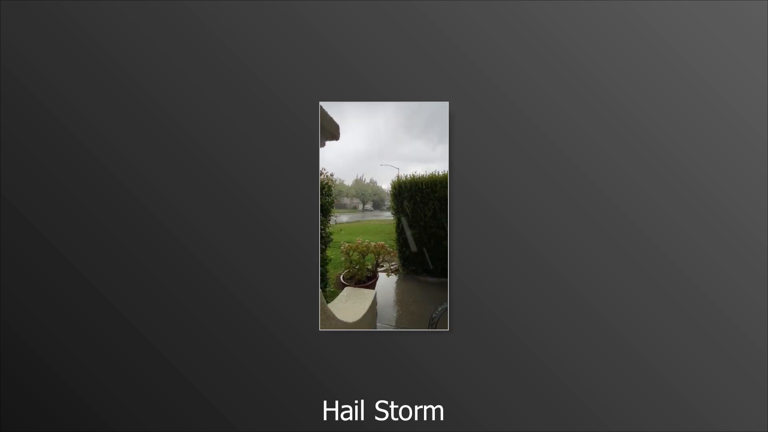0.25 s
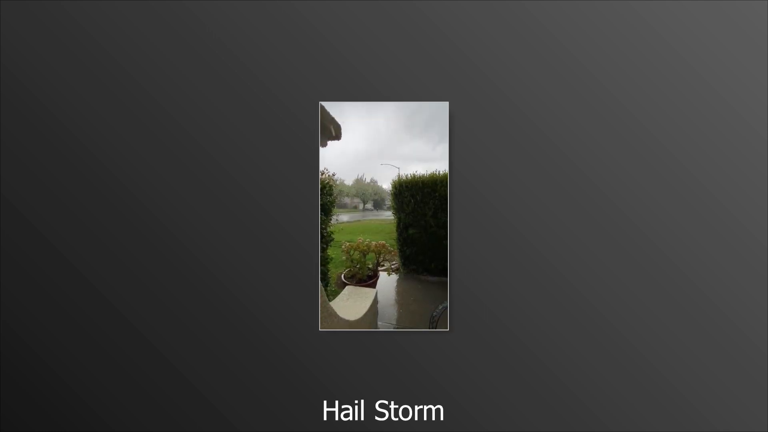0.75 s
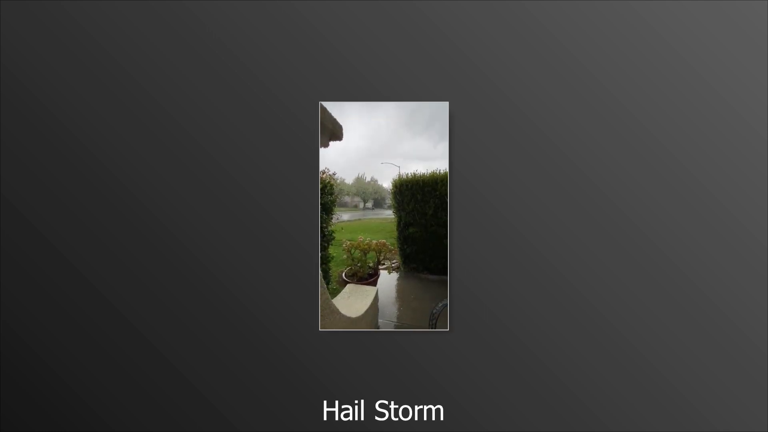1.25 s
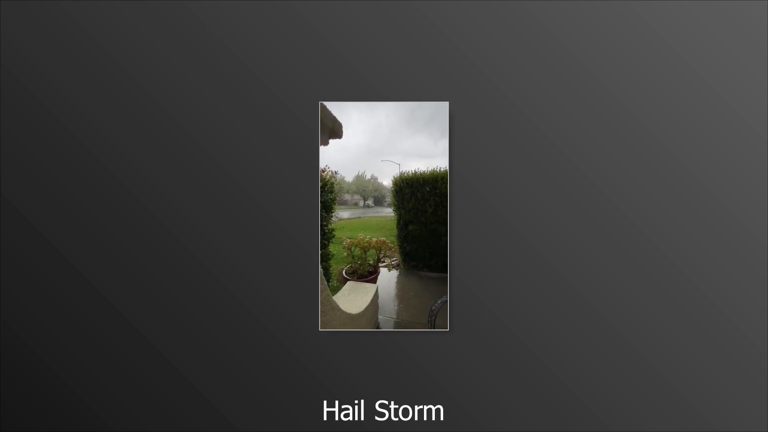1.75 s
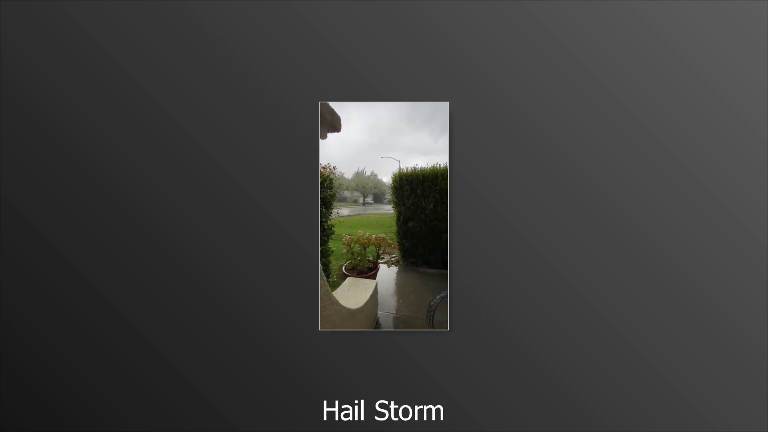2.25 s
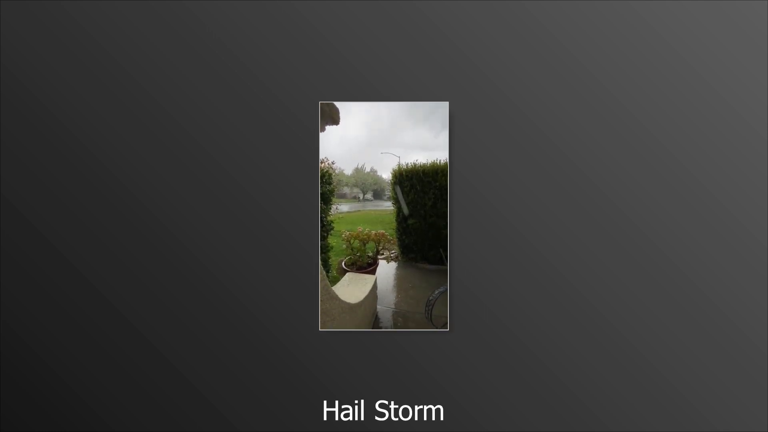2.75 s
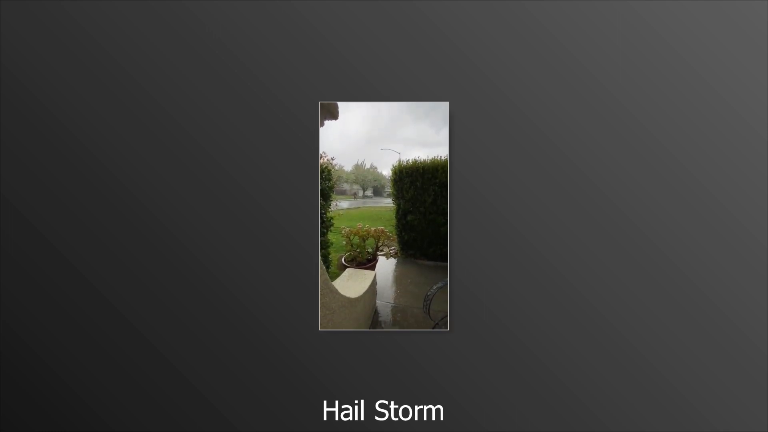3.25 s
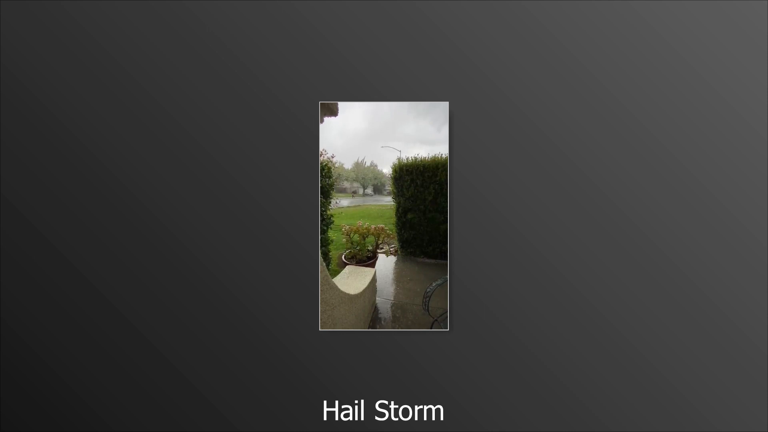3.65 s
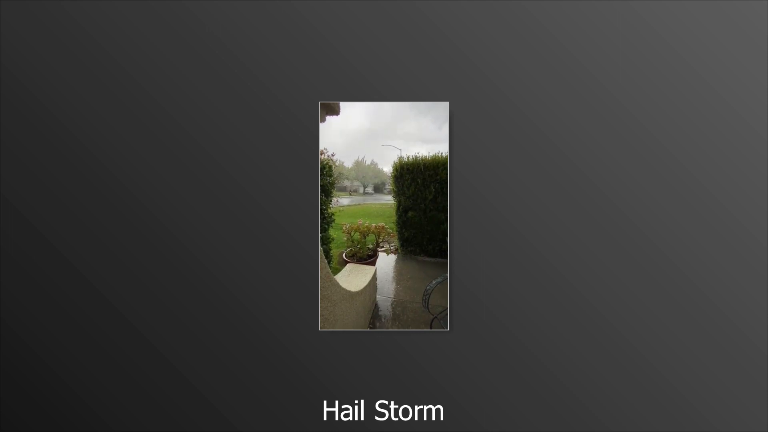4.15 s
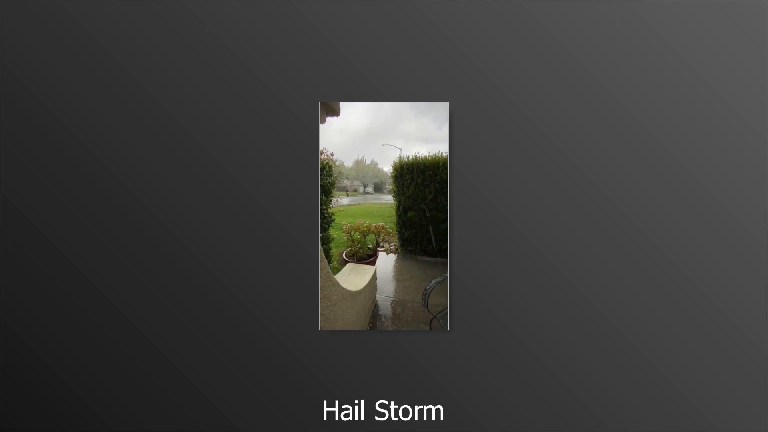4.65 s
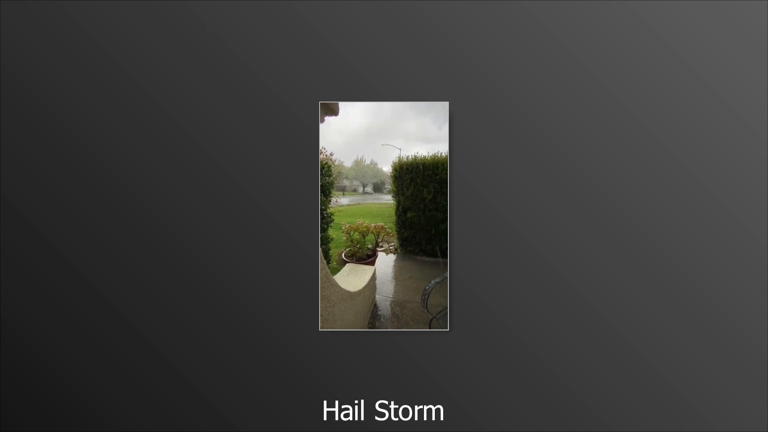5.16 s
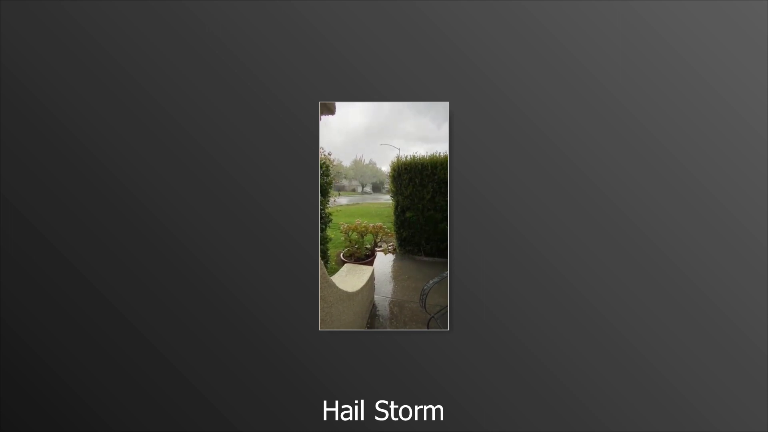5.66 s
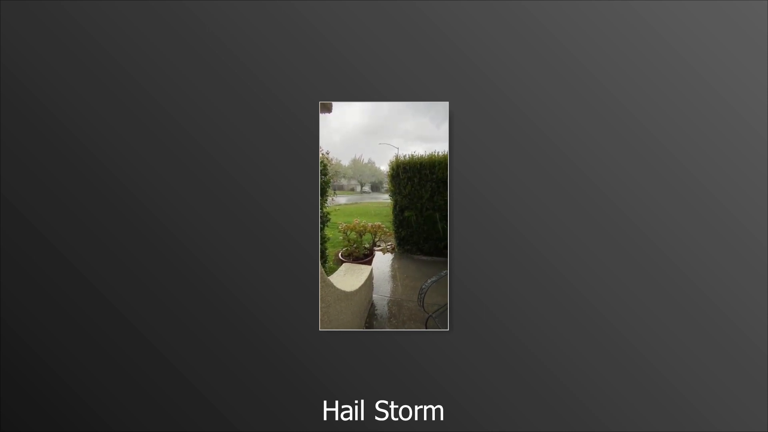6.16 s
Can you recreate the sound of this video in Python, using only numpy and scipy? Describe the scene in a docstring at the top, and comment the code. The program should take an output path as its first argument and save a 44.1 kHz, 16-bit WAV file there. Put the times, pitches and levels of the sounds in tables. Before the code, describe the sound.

A dense, crackling hail shower heard from under a porch, sharp nearby ice clicks over a constant hiss, and soft gusty thumps on a handheld phone.

```python
"""A steady hiss is heard first: hail, countless tiny impacts far off on a lawn, hedges and wet concrete.
Over it small stones patter and ping as decaying resonances, and near ones crack into rattling
bursts of splinters, coloured by the resonances under a porch roof; dry ticks and knocks sound close by.
Gusts of low-passed noise and single swirling eddies buffet the two ports of a hand-held phone."""
import sys
import numpy as np
from scipy import signal
from scipy.fft import rfft, irfft, next_fast_len
from scipy.io import wavfile
from scipy.ndimage import uniform_filter1d

SR = 44100
rng = np.random.default_rng(int(sys.argv[2]) if len(sys.argv) > 2 else 0)


def master(y):
    """Save y as 16-bit WAV."""
    cut = np.clip(np.atleast_2d(y).T, -1, 1)
    pcm = np.round(cut * 32767)  # scale
    wavfile.write(sys.argv[1], SR, pcm.astype(np.int16))


N = 282681
TIME = np.arange(N) / SR
FFT_SIZE = 2 * next_fast_len((N + SR) // 2, real=True)
FREQS = np.fft.rfftfreq(FFT_SIZE, 1 / SR) + 1e-3

# strength of the shower over time: time_s, relative_level_db
SHOWER_STRENGTH = [(0, -35), (.35, -35), (.7, -33.5), (1.86, -33.5), (2.57, -32.5), (2.95, -30.5),
                   (3.46, -30.5), (3.69, -34.5), (3.96, -32), (4.34, -33.5), (5.1, -32.5), (5.36, -35.5),
                   (6.41, -34)]
# spectrum of the far hail: frequency_hz, gain_db
HISS_SPECTRUM = [(25, -23.5), (90, -3), (200, -3.5), (350, -2.5), (570, 2), (900, 1), (1400, -4.5),
                 (2000, -6.5), (2550, -3), (3600, -12), (5400, -12.5), (7500, -13), (10000, -13.5),
                 (12500, -24)]
# narrow resonances under the porch: frequency_hz, width_hz, relative_gain_db
PORCH_RESONANCES = [(604, 55, 6.5), (982, 27, 5.5), (1882, 25, 7), (2074, 17, 10), (2492, 50, 6),
                    (3560, 38, 7), (3810, 45, 5), (4075, 42, 9), (4550, 24, 8), (5025, 70, 8.5),
                    (5420, 37, 10.5), (5910, 96, 6), (7140, 36, 4.5), (9450, 21, 6.5)]
# centre of the band struck by each size of small stone: pitch_hz
PATTER_PITCHES = [2330, 3100, 4200, 6400, 9200]
# spectrum of shattering ice: frequency_hz, gain_db
CRACK_SPECTRUM = [(300, -16), (900, -2), (1400, -10), (2000, -9.5), (2600, -0.5), (3500, -10.5),
                  (4500, -9.5), (5700, -10), (7500, -11), (10000, -7.5), (12500, -9.5)]
# spectrum of the turbulence: frequency_hz, gain_db
WIND_SPECTRUM = [(20, -32), (40, -1), (65, 2.5), (120, -2.5), (200, -5), (320, -8), (500, -9.5),
                 (1000, -29.5)]
# gusts, as pressure common to both ports and opposed between them:
# start_s, length_s, together_relative_db, across_relative_db, reach_hz
GUST_EVENTS = [(0.09, 0.024, -66, -39, 1000), (0.298, 0.48, -53, -37.5, 700), (0.925, 0.091, -60, -36, 620),
               (1.019, 0.023, -40, -27, 280), (1.19, .04, -47, -41, 300), (1.335, 0.072, -47, -32, 260),
               (1.675, 0.39, -49, -35.5, 470), (1.964, 0.1, -38.5, -31.5, 248),
               (2.096, 0.086, -32.5, -32, 381), (2.23, 0.083, -36.5, -38, 280), (2.35, 0.63, -54, -45, 150),
               (2.485, .03, -39, -41, 370), (2.884, 0.32, -41.5, -42, 450), (3.04, .11, -33, -39, 750),
               (3.165, 0.11, -42, -30, 350), (3.337, 0.086, -41, -27, 650), (3.49, 0.11, -53, -38, 350),
               (3.678, 0.15, -38.5, -42, 160), (4.05, 0.22, -83, -37.5, 650), (4.65, 0.13, -41, -48, 253),
               (5.38, .22, -35, -38, 400), (5.628, 0.13, -38, -39, 283)]
# brief level changes in the low end, mostly dips:
# centre_s, length_s, common_wind_change_db, low_hail_change_db
LOW_DIPS = [(0.113, 0.015, -21, -5), (0.324, 0.024, -11, -7), (0.43, 0.048, 5, -9), (0.545, 0.095, -22, -7),
            (0.907, 0.025, -6, -5), (1.994, 0.073, 2, -11), (3.217, 0.037, -5, -14),
            (4.092, 0.029, -7, -12.5), (4.338, .05, -37, -2.5)]
# dry ticks and knocks close by: start_s, relative_level_db, pitch_hz, decay_s, left_lead_rad, snap_db
CLOSE_TICKS = [(0.1028, -3, 4500, 0.00047, 8.5, -26), (0.566, -22, 2870, .003, 4.5, -49),
               (0.798, -24, 4500, .0007, 14, -23.5), (0.835, -16, 3600, 0.00052, 16.5, -31),
               (0.892, -30, 5500, 0.0028, 6, -43), (1.708, -21, 2970, 0.0013, 10, -32),
               (1.928, -21.5, 2560, 0.0039, 11.5, -45), (2.033, -14, 5300, 0.0015, 7.5, -20),
               (2.576, -28, 2510, 0.0017, 10, -36), (2.809, -26, 4470, .003, 3, -40),
               (3.308, -26, 7140, 0.0031, 6, -49), (3.325, -18, 2930, 0.0011, 8, -36),
               (3.5925, -19, 4100, 0.003, 11, -25), (3.594, -12, 2670, 0.0038, 4.5, -45),
               (3.604, -20, 4100, .003, -1, -45), (3.618, -18, 3270, .002, 5.5, -41),
               (3.6214, -25, 2480, .0025, 0, -45), (4.028, -16.5, 4400, .002, 1, -47),
               (4.297, -28, 4060, 0.003, 1, -21), (4.990, -25, 4350, 0.0089, 6, -65),
               (4.994, -12, 2560, 0.013, 9, -47), (4.9965, -14.5, 2330, 0.0019, 9, -50),
               (5.0052, -21, 2420, 0.0034, -3, -48), (5.667, -24, 2870, 0.0032, 0, -46),
               (6.283, -27, 2520, .002, 0, -51)]
# upper edge of a snap's band, higher for harder snaps: snap_db, top_hz
SNAP_REACH = [(-25, 10000), (-19, 15000)]
# near stones that shatter: start_s, relative_level_db, pitch_hz, scatter_s
SHATTERING_STONES = [(0.157, -23.5, 2980, 0.031), (0.395, -29, 3500, 0.057), (0.563, -24.5, 2520, 0.018),
                     (0.603, -26.5, 2240, 0.02), (0.675, -26.5, 3920, .022), (0.755, -33, 3300, 0.013),
                     (0.932, -24, 5400, 0.0088), (1.056, -22.5, 2620, .018), (1.099, -29, 2360, 0.013),
                     (1.138, -25, 2490, 0.014), (1.292, -24.5, 2590, 0.015), (1.368, -27, 5330, 0.018),
                     (1.440, -27, 1900, 0.01), (1.483, -24.5, 4740, 0.017), (1.550, -23.5, 2510, 0.018),
                     (1.71, -24.5, 2780, 0.02), (1.778, -23.5, 2000, 0.033), (1.831, -26.5, 3930, .016),
                     (1.895, -28, 5230, 0.016), (1.926, -25, 2680, .015), (2.234, -23, 3700, 0.041),
                     (2.266, -23, 2420, .02), (2.291, -27, 2500, 0.0094), (2.357, -28, 4340, 0.065),
                     (2.579, -20.5, 2640, 0.013), (2.645, -34, 2200, 0.054), (2.806, -23.5, 4330, 0.031),
                     (2.846, -25, 3770, 0.015), (2.993, -19.5, 2500, 0.025), (3.045, -25.5, 3580, 0.017),
                     (3.135, -24, 2510, 0.038), (3.194, -25.5, 2950, 0.022), (3.324, -22.5, 2900, 0.018),
                     (3.414, -21.5, 2750, 0.026), (3.447, -25.5, 2270, 0.027), (3.564, -25, 1980, 0.031),
                     (3.594, -20.5, 3640, 0.018), (3.616, -19.5, 3250, 0.013), (3.891, -23, 2680, .021),
                     (3.923, -28, 4500, 0.046), (3.995, -25, 2600, .021), (4.03, -25.5, 2520, 0.03),
                     (4.103, -23, 3460, .024), (4.242, -25, 3100, 0.016), (4.294, -18.5, 4000, .018),
                     (4.381, -33, 3400, .008), (4.48, -25.5, 4370, 0.034), (4.517, -32, 4800, 0.041),
                     (4.627, -25, 2020, 0.017), (4.721, -23.5, 2400, .007), (4.854, -26, 3040, 0.017),
                     (4.991, -19.5, 2900, .015), (5.03, -29, 2180, 0.022), (5.090, -29, 2900, 0.018),
                     (5.271, -26, 2150, 0.058), (5.502, -29, 5500, 0.0097), (5.546, -23.5, 3900, 0.026),
                     (5.666, -28.5, 3160, 0.039), (5.967, -24, 1830, 0.031), (6.057, -25.5, 2300, 0.0092),
                     (6.158, -25, 2710, 0.025), (6.283, -24.5, 3770, 0.011), (6.351, -26, 2590, 0.042)]
# single eddies at the ports: centre_s, level_db, pitch_hz
EDDY_EVENTS = [(1.030, -18, 161), (1.041, -20, 74.6), (1.214, -27, 150), (1.381, -26.5, 129),
               (1.992, -23.5, 83.4), (2.117, -22, 157), (2.132, -19.5, 215), (2.506, -19, 160),
               (3.088, -21, 140), (3.103, -22, 180), (3.153, -21.5, 100), (3.148, -19.5, 425),
               (3.174, -22.5, 70), (3.345, -25.5, 308), (3.418, -22, 290), (5.414, -21, 88.5),
               (5.482, -26, 199), (5.498, -20, 194), (5.566, -24, 150), (5.585, -21, 201),
               (5.713, -22, 137)]
# how the two ports differ: frequency_hz, left_lead_rad, left_minus_right_db, likeness (0-1)
PORT_DIFFERENCES = [(190, 0.49, 0, 0.86), (328, 0.5, -3.5, 1), (448, 1.2, -0.5, 0.3), (607, 2.64, 6, 0.95),
                    (1466, 5.23, -1.5, 0.46), (1940, 7.4, 3.5, 0.77), (2214, 2.28, 0, 0.07),
                    (2610, 3.44, 2, 0.59), (3280, 3.55, -5.5, 0.11), (3700, 7.56, 0.5, 0.63),
                    (4600, 6.93, -5, 0.56), (5220, 11.6, -4.5, 0.64), (7200, 13.03, -0.5, 0.52),
                    (9000, 15.75, 1, 0.06), (10680, 14.6, 1, 1)]
# stereo setting of the highest treble, left and right in opposite polarity:
# frequency_hz, left_lead_rad, left_minus_right_db, likeness (0-1)
TREBLE_STEREO = [(11800, 5 * np.pi, 0, .9998)]

# the lawn's mean level, and how many dB it moves per dB of the shower
LAWN_DB, LAWN_FOLLOWS = -34.5, 0.2
HISS_FLICKER_DB, LAWN_FLICKER_DB = 0.8, 0.9
PORCH_SWAY_DB, PORCH_SWAY_PER_S = 3, 9
PATTER_PER_S, PATTER_SPREAD_DB = 48, 1.4
CONTACT_S, CONTACT_GAIN, SPRAY_S = 0.001, 2.2, 0.009
# light air between gusts, common to the ports and opposed between them
BREEZE_DB, BREEZE_ACROSS_DB, BREEZE_REACH_HZ, BREEZE_SWAY_DB = -48.5, -56, 134, 1.5
GUST_ATTACK_S, GUST_RELEASE_S = 0.0012, 0.047
LOW_DIP_BELOW_HZ = 580
# the hail's lows and mids dip briefly around the first tick
DIP_AT_S, DIP_LENGTH_S, DIP_DB, DIP_BELOW_HZ = 0.109, 0.02, -13, 3200
SNAP_S, SNAP_LOW_HZ = 0.00055, 4930
# the first contact of a stone stands out of its rattle
FIRST_BLOW, FIRST_BLOW_S, RISE_S = 0.2, 0.003, 0.0007
# small eddies are high and short: duration in cycles, phase step between the ports in radians
EDDY_CYCLES, EDDY_LEAD = 0.48, 1.07
TOP_HZ = 15900


def undb(db):
    """Amplitude ratio: twenty decibels are a factor of ten."""
    return 10 ** (np.asarray(db) / 20)


def unit(x):
    """Normalization: scale to a root-mean-square of 1."""
    return x / np.sqrt(np.mean(x ** 2))


def curves(table):
    """Linear interpolation of a time table's columns, one value a sample."""
    s, *columns = np.transpose(table)
    return [np.interp(TIME, s, c) for c in columns]


def spectra(table):
    """Interpolation of a frequency table's columns along a logarithmic axis."""
    hz, *columns = np.transpose(table)
    return [np.interp(np.log(FREQS), np.log(hz), c) for c in columns]


def colour(x, db):
    """Minimum-phase filtering: a folded cepstrum keeps the ringing after each blow."""
    cepstrum = irfft(np.log(undb(db)))
    cepstrum[1:FFT_SIZE // 2] *= 2
    cepstrum[FFT_SIZE // 2 + 1:] = 0
    response = np.exp(rfft(cepstrum))
    return irfft(rfft(x, FFT_SIZE) * response)[..., :N]


def low_pass(x, hz):
    """Zero-phase filtering: forward and backward passes cancel the delay."""
    return signal.sosfiltfilt(signal.butter(3, hz, fs=SR, output="sos"), x)


def resonate(x, hz, q):
    """Resonance: a band around one frequency answers, narrower for higher q."""
    return signal.lfilter(*signal.iirpeak(hz, q, fs=SR), x)


def walk(rate):
    """Slow random fluctuation: held noise smoothed twice, with rms near 1."""
    k = max(int(SR / rate), 1)
    held = np.repeat(rng.standard_normal(N // k + 1), k)
    return unit(uniform_filter1d(uniform_filter1d(held, k), k)[:N])


def impacts(rate, spread_db):
    """Shot noise: random clicks of uneven size, as two independent channels."""
    sizes = undb(spread_db * np.minimum(rng.exponential(size=(2, N)), 4))
    struck = rng.random((2, N)) < rate / SR
    return unit(struck * sizes * rng.choice([-1, 1], (2, N)))


def porch(x, depth):
    """Resonance in an enclosure: narrow bands ring, each waxing and waning at random."""
    out = x
    for hz, width, db in PORCH_RESONANCES:
        sway = undb(PORCH_SWAY_DB * (walk(PORCH_SWAY_PER_S) - 1.5))
        drive = (undb(depth * db) - 1) * sway
        out = out + resonate(x * drive, hz, hz / width)
    return out


def far_hail():
    """Superposition: dense impacts merge; soft ground gives the lows, hard ground the hiss."""
    hiss_db = curves(SHOWER_STRENGTH)[0]
    lawn_db = LAWN_DB + LAWN_FOLLOWS * (hiss_db - hiss_db.mean())
    clicks = impacts(rate=9000, spread_db=2.5)
    bed = unit(porch(colour(clicks, spectra(HISS_SPECTRUM)[0]), depth=1.0))
    lawn = low_pass(bed, 2320)
    soft = lawn * undb(lawn_db + LAWN_FLICKER_DB * walk(12))
    hard = (bed - lawn) * undb(hiss_db + 3.0 + HISS_FLICKER_DB * walk(24.9))
    return soft + hard


def patter(level_db=-6.5):
    """Impulse excitation: small stones each give a hard contact and a short spray of splinters."""
    out = 0
    for hz in PATTER_PITCHES:
        blows = np.abs(impacts(PATTER_PER_S, PATTER_SPREAD_DB)[0])
        # one-pole filters turn every blow into an exponential decay
        contact = signal.lfilter([1], [1, -np.exp(-1 / (CONTACT_S * SR))], blows)
        spray = signal.lfilter([1], [1, -np.exp(-1 / (SPRAY_S * SR))], blows)
        burst = (CONTACT_GAIN * contact + spray) * impacts(rate=8700, spread_db=0.5)
        out = out + resonate(burst, hz, 1)
    level = undb(curves(SHOWER_STRENGTH)[0] + level_db)
    return unit(colour(out, spectra(CRACK_SPECTRUM)[0])) * level


def pings(count, low_hz, high_hz, cycles, spread_db, level_db):
    """Damped free vibration: pellets on paving, pots and leaves each ring at their own pitch."""
    out, t = np.zeros((2, N)), TIME[:SR // 20]
    hiss_db = curves(SHOWER_STRENGTH)[0]
    for when, pitch, chance, direction in rng.random((count, 4)):
        start = int(when * (N - len(t)))
        hz = low_hz * (high_hz / low_hz) ** pitch
        size_db = spread_db * min(-np.log(chance), 4)
        db = level_db + hiss_db[start] - hiss_db.mean() + size_db
        ring = undb(db) * np.exp(-t * hz / cycles) * np.sin(2 * np.pi * hz * t)
        angle = np.pi * direction
        out[:, start:start + len(t)] += np.outer([np.cos(angle), np.sin(angle)], ring)
    return out


def wind(flutter_db=2.0):
    """Turbulent pressure: gusts rise, hold and die over a breeze, in common and opposed at the ports."""
    flutter = undb(flutter_db * np.array([walk(40), walk(36)]))
    rumble = unit(colour(rng.standard_normal((2, N)), spectra(WIND_SPECTRUM)[0]) * flutter)
    breeze = undb([[BREEZE_DB], [BREEZE_ACROSS_DB]]) * undb(BREEZE_SWAY_DB * walk(7.4))
    air = low_pass(rumble, BREEZE_REACH_HZ) * breeze
    for s, length_s, together_db, across_db, reach_hz in GUST_EVENTS:
        span = slice(int(s * SR), int((s + length_s + 10 * GUST_RELEASE_S) * SR))
        t = TIME[span] - s
        release = np.exp(-np.maximum(t - length_s, 0) / GUST_RELEASE_S)
        force = np.clip(t / GUST_ATTACK_S, 0, 1) * release
        # each gust takes a different stretch of the turbulence
        swirl = np.roll(rumble, rng.integers(N), axis=1)[:, span]
        air[:, span] += undb([[together_db], [across_db]]) * force * low_pass(swirl, reach_hz)
    together, across = air
    return together * low_dips()[0] + np.array([across, -across])


def low_dips():
    """Amplitude modulation: bell-shaped gain changes for the common wind and the low hail."""
    changes_db = 0
    for s, length_s, *db in LOW_DIPS:
        changes_db = changes_db + np.outer(db, np.exp(-((TIME - s) / length_s) ** 2))
    return undb(changes_db)


def duck(x, gain, hz):
    """Band-limited modulation: a gain acts only on what lies below a frequency."""
    return x - (1 - gain) * low_pass(x, hz)


def ticks(grit=0.54, ring_s=0.0091):
    """Damped vibration: close ticks and knocks snap, ring briefly and crunch near the same pitch."""
    out, t = np.zeros((2, N)), TIME[:SR // 8]
    for s, db, hz, decay_s, lead, snap_db in CLOSE_TICKS:
        top_hz = np.interp(snap_db, *np.transpose(SNAP_REACH))
        treble = signal.butter(6, [SNAP_LOW_HZ, top_hz], "band", fs=SR, output="sos")
        band = signal.butter(3, [hz / 1.49, min(hz * 1.16, .4 * SR)], "band", fs=SR, output="sos")
        crunch = unit(signal.sosfilt(band, rng.standard_normal((2, len(t)))))
        ring = np.exp(-t / ring_s) * np.sin(2 * np.pi * hz * t - np.array([[0], [lead]]))
        # a bright, very short snap at the onset
        snap = np.exp(-t / SNAP_S) * unit(signal.sosfilt(treble, rng.standard_normal(len(t))))
        # the ring and crunch take about half a cycle to build up
        fade = np.exp(-t / decay_s) * (1 - np.exp(-(2 * hz * t) ** 2))
        start = int(s * SR)
        body = undb(db) * fade * (ring + grit * crunch)
        out[:, start:start + len(t)] += body + undb(snap_db) * snap
    return out


def near_stones(echo_db=-17, echo_s=0.1, focus=2.7, ring_db=-3, ring_q=30, level_db=-2.0):
    """Fracture and reflection: splinters and wall echoes build up and fade as a rattle."""
    out, size = np.zeros((2, N)), SR // 3
    splinters = impacts(rate=4900, spread_db=1.0)
    crack_db = spectra(CRACK_SPECTRUM)[0]
    detune = 2 ** rng.uniform(-0.584, 0.874, (len(SHATTERING_STONES), 3))
    for (s, db, hz, scatter_s), ratios in zip(SHATTERING_STONES, detune):
        start = int(s * SR)
        t = TIME[:min(size, N - start)]
        blow = FIRST_BLOW * np.exp(-t / FIRST_BLOW_S)
        scatter = np.exp(-(t / scatter_s) ** 1.01)
        echo = undb(echo_db) * np.exp(-t / echo_s)
        fade = (blow + scatter + echo) * (1 - np.exp(-t / RISE_S))
        burst = splinters[:, start:start + len(t)] * fade
        # the size of the stone favours one broad band
        body = focus * resonate(burst, hz, 1.2)
        # the spot it strikes adds short rings, made equally loud by undoing the crack spectrum
        rings = 0
        for f in hz * ratios:
            gain = undb(ring_db - np.interp(f, FREQS, crack_db))
            rings = rings + gain * resonate(burst, f, ring_q)
        out[:, start:start + len(t)] += undb(db) * (burst + body + rings)
    return undb(level_db) * colour(out, crack_db)


def eddies():
    """Vortex passage: a swirl of about one cycle thumps the ports with a phase step between them."""
    out = np.zeros((2, N))
    for s, db, hz in EDDY_EVENTS:
        length_s = EDDY_CYCLES / hz
        near = np.abs(TIME - s) < np.pi * length_s
        t = TIME[near] - s
        turn = rng.uniform(0, 2 * np.pi) + np.array([[0], [EDDY_LEAD]])
        swell = np.exp(-(t / length_s) ** 2)
        out[:, near] += undb(db) * swell * np.sin(2 * np.pi * hz * t + turn)
    return out


def ports(pair):
    """Diffraction and coherence: the phone's body delays and shades sound; the top treble is set apart."""
    lead, balance_db, likeness = spectra(PORT_DIFFERENCES + TREBLE_STEREO)
    likeness = np.clip(likeness, 0, 1)
    # power weights of the shared and opposed parts set the likeness
    weights = np.sqrt([(1 + likeness) / 2, (1 - likeness) / 2])
    shared, apart = rfft(pair, FFT_SIZE) * weights
    left = (shared + apart) * undb(balance_db / 2)
    right = (shared - apart) * undb(-balance_db / 2) * np.exp(-1j * lead)
    return irfft([left, right])[:, :N]


def scene():
    """Superposition of hail at several distances, close ticks and the wind."""
    dry_pings = pings(count=1100, low_hz=1850, high_hz=9500, cycles=3.6, spread_db=2.0, level_db=-32)
    ringing_pings = pings(count=700, low_hz=1507, high_hz=6840, cycles=34, spread_db=0.1, level_db=-39)
    plops = pings(count=400, low_hz=423, high_hz=1580, cycles=11.0, spread_db=1.2, level_db=-37.0)
    cracks = porch(patter() + near_stones(), depth=1.11)
    hail = far_hail() + cracks + dry_pings + ringing_pings + plops
    thinned = duck(hail, low_dips()[1], LOW_DIP_BELOW_HZ)
    # the fourth power gives the dip a flat floor
    dip = undb(DIP_DB * np.exp(-((TIME - DIP_AT_S) / DIP_LENGTH_S) ** 4))
    return ports(duck(thinned, dip, DIP_BELOW_HZ)) + ticks() + wind() + eddies()


def record(dry):
    """Band limitation: the phone cuts the deepest rumble and the top."""
    lean = signal.sosfilt(signal.butter(2, 32, "high", fs=SR, output="sos"), dry)
    return signal.sosfilt(signal.ellip(8, .2, 70, TOP_HZ, fs=SR, output="sos"), lean)


dry = scene()
out = record(dry)
master(out)
```